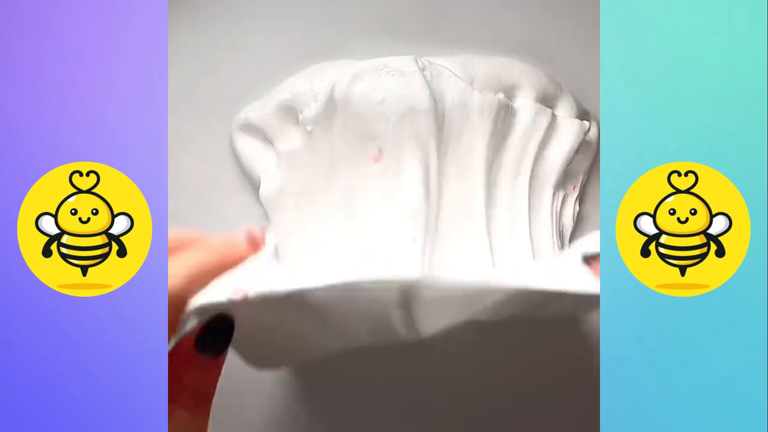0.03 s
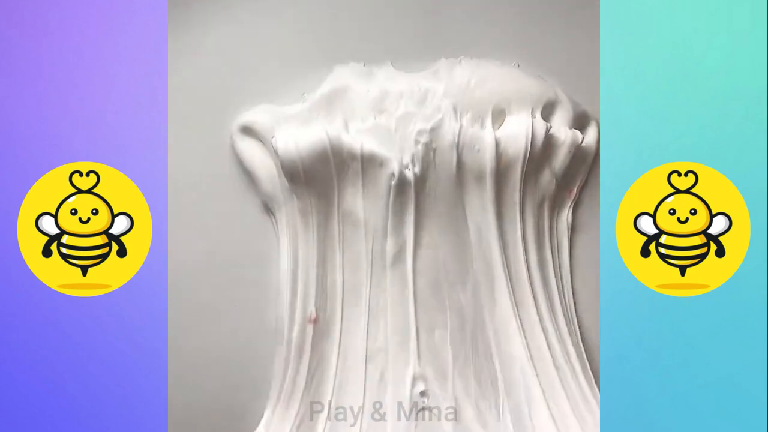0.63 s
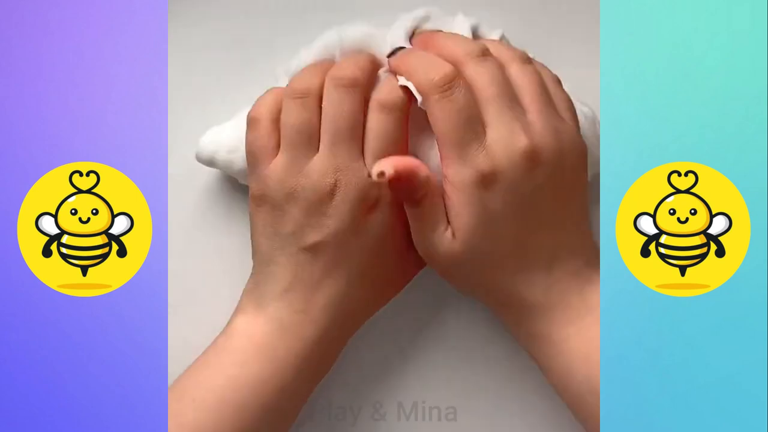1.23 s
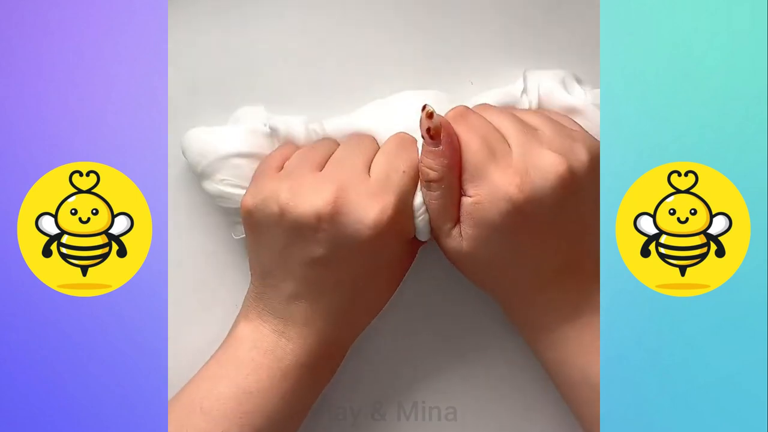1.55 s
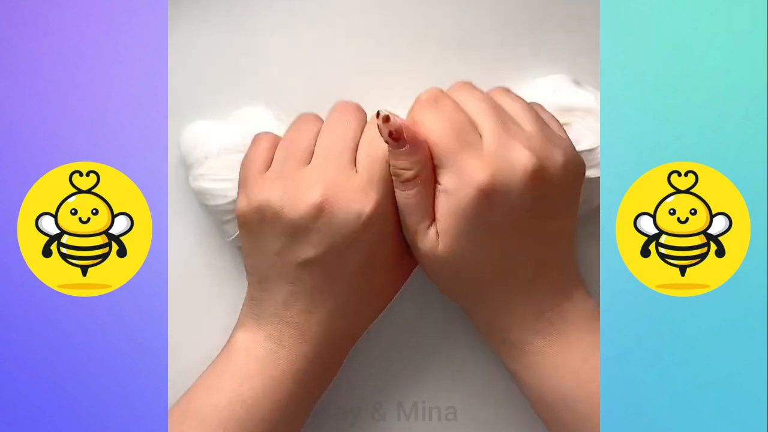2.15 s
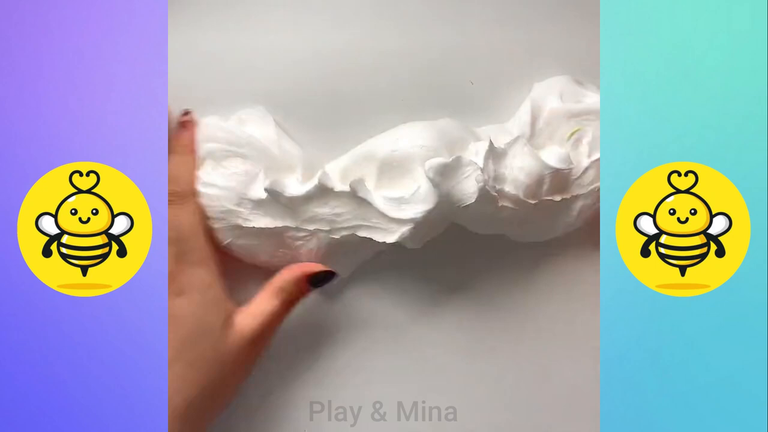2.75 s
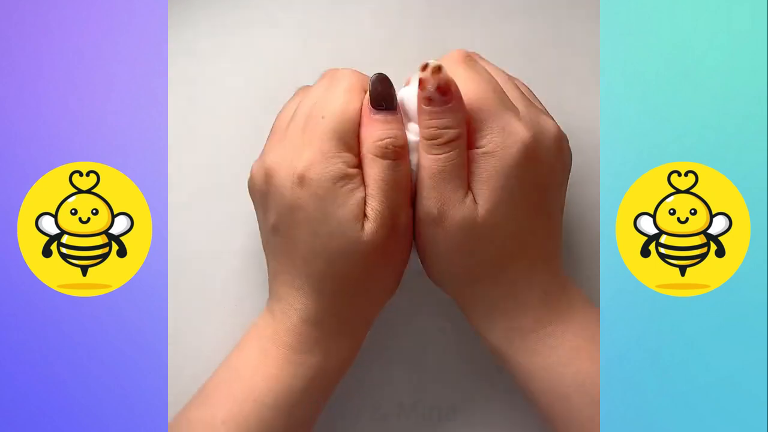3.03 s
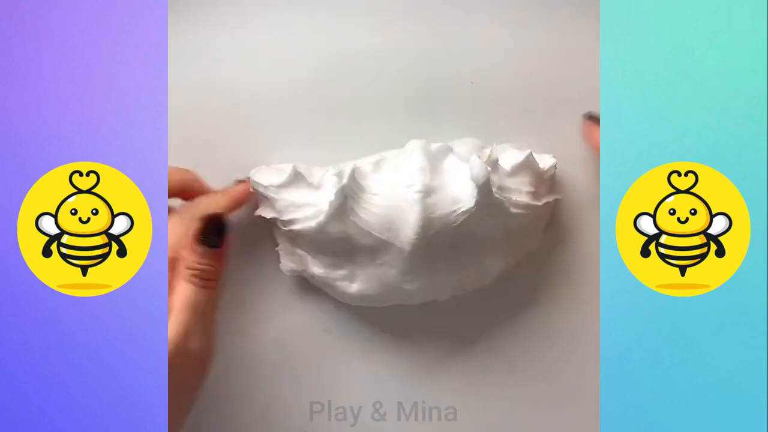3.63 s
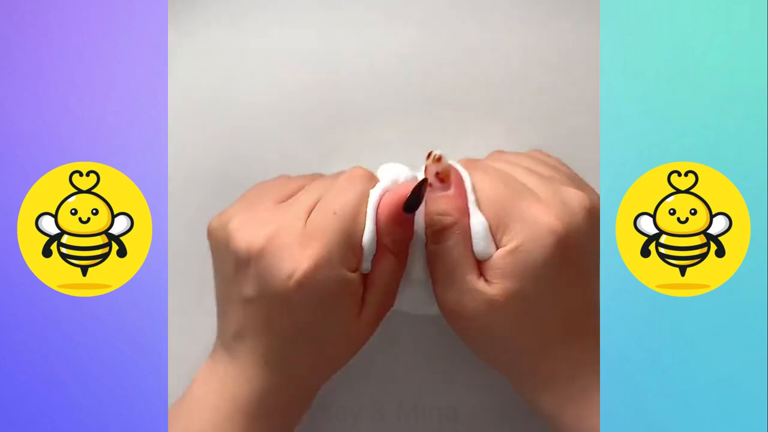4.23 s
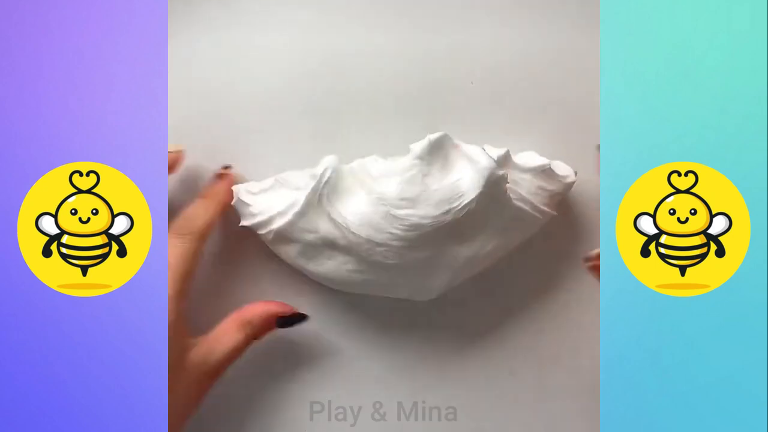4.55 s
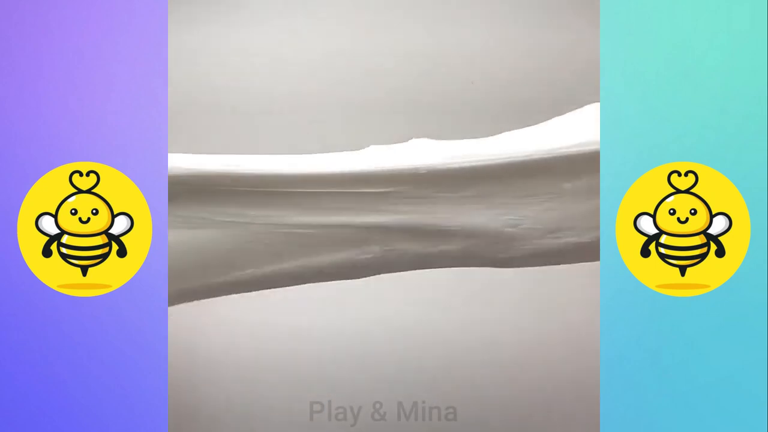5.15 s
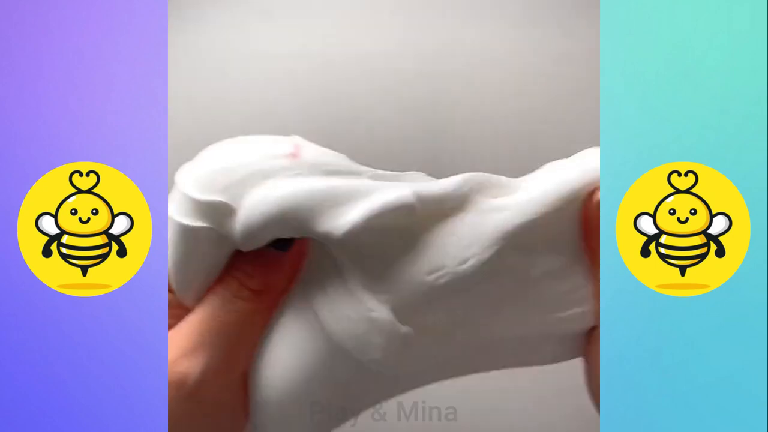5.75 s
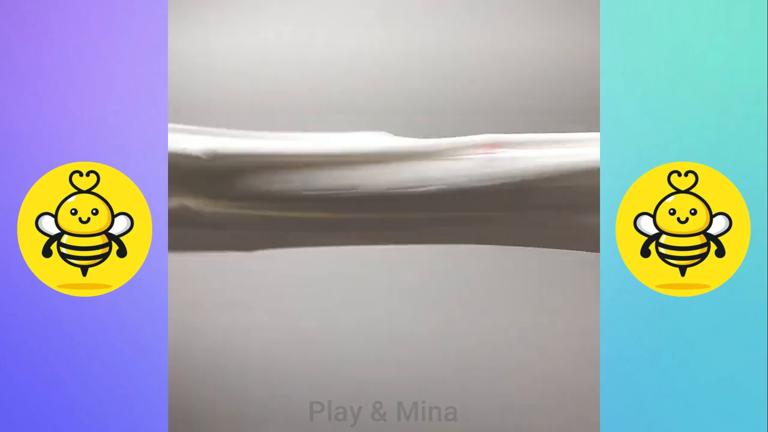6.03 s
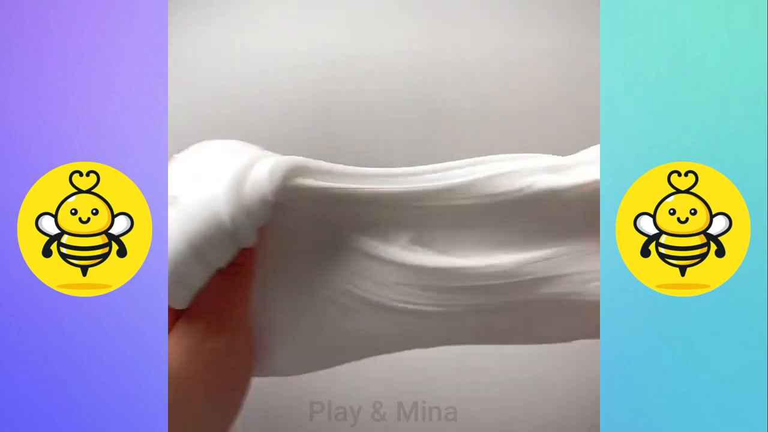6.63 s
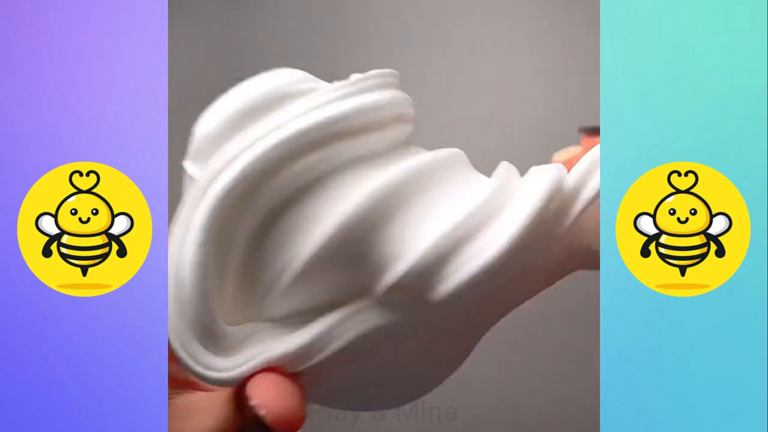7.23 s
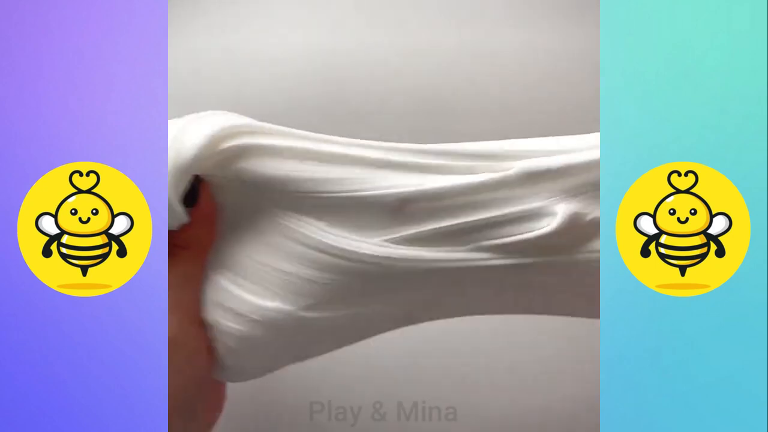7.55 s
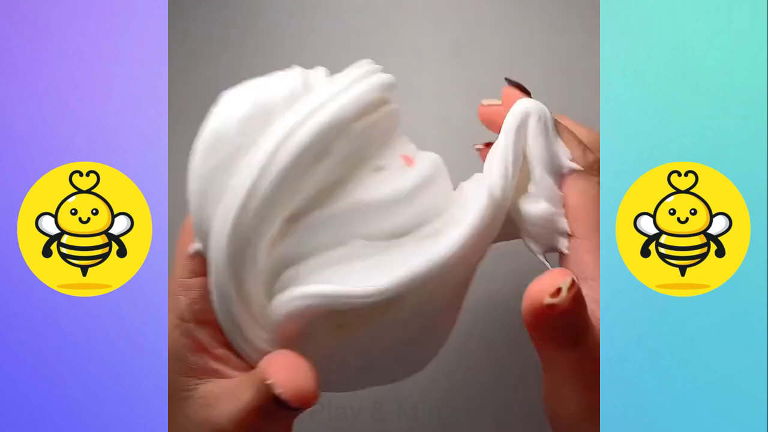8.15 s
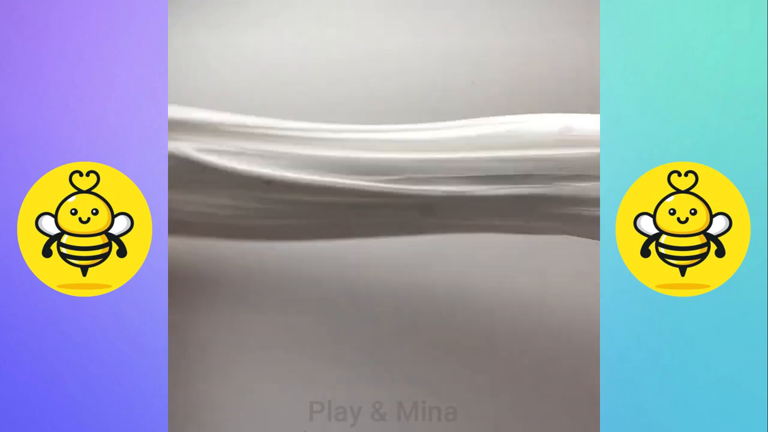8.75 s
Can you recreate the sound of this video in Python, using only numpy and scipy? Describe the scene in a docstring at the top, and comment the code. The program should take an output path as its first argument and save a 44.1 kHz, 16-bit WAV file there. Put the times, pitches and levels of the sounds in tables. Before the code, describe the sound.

Hands press and fold fluffy slime on a table, close to a stereo microphone in a small quiet room. Tiny bubbles fizz with each squeeze, air pockets burst in wet pops, and the tabletop thumps softly, with one loud squelching cluster early on. In the second half the slime is stretched about once a second with a soft crackle and rising squish, and claps shut four times with a hollow plop.

```python
"""At a table in a small quiet room, hands press and fold fluffy slime close to a stereo microphone.
Tiny bubbles fizz with every squeeze, trapped air pockets burst in wet, falling pops, and the hands
thump the table top. Later the slime is lifted and pulled into a sheet with a rising squish, about once
a second. Four times it claps shut on the air inside with a hollow plop."""
import sys
import numpy as np
from scipy import signal
from scipy.fft import rfft, irfft, next_fast_len
from scipy.io import wavfile

SR = 44100
rng = np.random.default_rng(int(sys.argv[2]) if len(sys.argv) > 2 else 0)


def put_to_file(sound):
    """Save the sound as 16-bit audio at rate SR, in the file named by the first command-line argument."""
    columns = np.atleast_2d(sound).T  # one column per channel
    safe = np.clip(columns, -1, 1)
    whole_steps = np.round(safe * 32767)
    wavfile.write(sys.argv[1], SR, whole_steps.astype(np.int16))


N = 396459
SHORT, LONG = 8192, 2 * next_fast_len(N // 2 + 1)  # samples for one short sound and for the whole scene
T = np.arange(SHORT) / SR
HZ, ALL_HZ = np.fft.rfftfreq(SHORT, 1 / SR) + 1, np.fft.rfftfreq(LONG, 1 / SR)
OVERTONE = 2.3  # an air pocket's second pitch is this many times its first

def amp(db):
    """Turns decibels into a number to multiply by."""
    return 10 ** (np.asarray(db) / 20)

def look_up(curve, hz):
    """Reads smoothly between the rows of a (frequency, value) table."""
    row_hz, value = np.transpose(curve)
    return np.interp(np.log(hz + 1), np.log(row_hz), value)

def unit(x):
    """Scales a sound to an energy of one per channel, on average."""
    return x / np.sqrt(np.mean(np.sum(x ** 2, -1)) + 1e-20)

def pan(left_db):
    """Gains that make the left side left_db louder than the right."""
    return amp([[left_db / 2], [-left_db / 2]])

def add(mix, start_s, sound):
    """Mixes a sound in at its start time."""
    part = mix[:, max(round(start_s * SR), 0):][:, :sound.shape[-1]]
    part += sound[..., :part.shape[1]]

def add_hit(mix, start_s, sound, lead_in=512):
    """Mixes in a short hit, first moving its soft lead-in from the end of the array to the front."""
    gain = np.sqrt(.005 * SR)  # an energy of one becomes a level of one over 5 ms
    fade = signal.windows.tukey(SHORT, lead_in / SHORT)
    add(mix, start_s - lead_in / SR, gain * np.roll(sound, lead_in, axis=-1) * fade)

def hump(centre_hz, octaves):
    """A bell-shaped filter curve around one pitch."""
    return np.exp(-.5 * (np.log2(HZ / centre_hz) / octaves) ** 2)

def filtered(x, curve):
    """A short sound passed through a filter curve, with an energy of one."""
    return unit(irfft(rfft(x) * curve))

def coloured(x, tone):
    """Shapes a scene-long sound with a (Hz, dB) table and sets its average level to one."""
    return np.sqrt(N) * unit(irfft(rfft(x, LONG) * amp(look_up(tone, ALL_HZ)), LONG)[..., :N])

def resonate(x, hz, width_hz):
    """Makes x ring at a moving pitch by passing it twice through the same resonance."""
    turn, feedback = np.exp(2j * np.pi * np.cumsum(hz) / SR), np.exp(-np.pi * width_hz / SR)
    for _ in range(2):
        x = 2 * (turn * signal.lfilter([1 - feedback], [1, -feedback], x / turn + 1e-18)).real
    return x

def gulp(pitch_hz, octaves, turns):
    """A ringing push whose treble arrives before its bass, so the pitch drops; more turns, slower drop."""
    phase = 2 * np.pi * (turns * np.log(HZ) + rng.random())
    tone = hump(.8 * pitch_hz, octaves) + .8 * hump(pitch_hz, .1)
    return unit(irfft(tone * np.exp(-1j * phase)))

def wet_gulp(pitch_hz):
    """Escaping air gulps and scatters off the hands and folds."""
    noise = rng.standard_normal((2, SHORT))
    splash = (noise[0] + .5 * noise) * T * np.exp(-T / .0048)
    scatter = filtered(splash, hump(pitch_hz, 1))
    air = np.roll(gulp(pitch_hz, octaves=.8, turns=1.4), round(.0007 * SR))
    return unit(air + .35 * scatter)

def crack(centre_hz, decay_s, octaves, ring, rise_s=.00019):
    """A skin of slime tears: a short burst of noise with a few narrow ringing pitches."""
    shared, apart = rng.standard_normal((2, 2, SHORT))
    snap = 4 * np.exp(-T / .00013)  # the first instant is the strongest
    envelope = (1 - np.exp(-T / rise_s)) ** 2 * (np.exp(-T / decay_s) + snap)
    side_rings = sum(hump(centre_hz * 2 ** k, .05) for k in rng.uniform(-1.4, 1, size=3))
    rings = hump(centre_hz, .14) + side_rings
    bass_cut = HZ ** 2 / (HZ ** 2 + 1100 ** 2)
    tone = hump(centre_hz, octaves) * (1 + ring * rings) * bass_cut
    return filtered((shared[0] + 1.3 * apart) * envelope, tone)

def air_ring(hz, decay_s, octaves_per_s):
    """The air in an open pocket rings for a few cycles; its pitch slides as the pocket changes size."""
    pitch = hz * 2 ** (octaves_per_s * (np.minimum(T, 6 * decay_s) - decay_s))
    return unit(T * np.exp(-T / decay_s) * np.sin(2 * np.pi * np.cumsum(pitch) / SR))

# The tone of the quiet room. Each row: frequency in Hz, relative level in dB.
HUSH_TONE = [(20, -13), (65, 14.5), (130, 4), (400, -8), (1500, -19.5), (6000, -18.5), (15000, -27.5)]
def room_hush():
    """A faint, steady, mostly low noise."""
    noise = rng.standard_normal(N) + .5 * rng.standard_normal((2, N))
    return amp(-58.5) * coloured(noise, HUSH_TONE)

# How long the room echoes. Each row: frequency in Hz, seconds to fade by 60 dB.
ECHO_TIMES = [(150, 0.19), (1000, 0.15), (5000, 0.19), (14000, 0.066)]
def room_echo(x):
    """Scattered reflections, each pitch fading at its own speed; the bass is alike on both sides."""
    reflections = rng.standard_normal((2, SR)) * (rng.random((2, SR)) < 3000 / SR)
    reflections *= np.arange(SR) > .003 * SR  # none in the first 3 ms
    hz, t, (left, right) = signal.stft(reflections, SR, nperseg=256)
    alike = np.exp(-(hz / 650) ** 2)[:, None]
    bands = np.array([left, alike * left + np.sqrt(1 - alike ** 2) * right])
    fade = amp(-60 * t / look_up(ECHO_TIMES, hz)[:, None])
    tail = signal.istft(bands * fade, SR, nperseg=256)[1]
    return signal.fftconvolve(x, unit(tail), axes=1)[:, :N]

# Slime dragging over the table. Each row: middle in seconds, swell time in seconds, level in dB,
# pitch in Hz.
TABLE_DRAGS = [(0.403, 0.079, -51.5, 185), (3.907, 0.055, -45.5, 181), (5.025, 0.095, -45, 182)]
def groans():
    """Dragged slime sticks and slips, giving a low, rough groan that rises slightly."""
    out, t = np.zeros((1, N)), np.arange(SR) / SR - .5
    for middle, swell_s, db, hz in TABLE_DRAGS:
        pitch = hz * 2 ** (.05 * np.tanh(t / swell_s))
        slip = resonate(rng.standard_normal(SR), pitch, width_hz=90)
        swell = np.exp(-(t / swell_s) ** 2)
        add(out, middle - .5, amp(db) * swell * np.sqrt(SR) * unit(slip))
    return out

# The table top's own notes. Each row: pitch in Hz, relative level in dB, seconds to fade by 60 dB.
TABLE_NOTES = [(68, -19, .3), (114, -3, .14), (130, 0, .25), (173, -6, .22)]
def table_ring():
    """The table top rings with a few low, fading notes after one knock."""
    return unit(sum(amp(db - 60 * T / fade_s) * np.sin(2 * np.pi * hz * T)
                    for hz, db, fade_s in TABLE_NOTES))

# Slime and hands landing on the table. Each row: start in seconds, level in dB, pitch in Hz,
# the table's ring in dB compared with the push.
LANDINGS = [(0.213, -24, 125.7, -0.5), (.232, -27, 41.97, -20), (.288, -31.5, 64.3, -10),
            (0.943, -33.5, 130, 7), (1.111, -46, 103.1, 10), (1.238, -15, 111.4, -4),
            (1.253, -18, 115.4, 8.5), (1.3, -26, 113.2, -6.5), (1.367, -6, 173.6, -25.5),
            (1.394, -5.5, 211.5, -27.5), (1.414, -24, 159.2, 2.5), (1.455, -24.5, 129.3, 15),
            (1.557, -17.5, 144.5, 3), (2.046, -21, 138.8, 7), (2.094, -22.5, 120.9, 12.5),
            (2.544, -32, 119.7, 4), (2.796, -24.5, 136.6, 6.5), (3.686, -40, 121.7, 15.5),
            (4.717, -33.5, 129.5, 4.5), (5.464, -31.5, 122.7, -13), (6.338, -21.5, 106.2, -19),
            (7.243, -18, 202.5, -14.5), (8.154, -26.5, 156.6, -14)]
def thumps():
    """Soft, heavy landings set the table ringing."""
    out, table = np.zeros((2, N)), rfft(table_ring())
    for start, db, pitch_hz, ring_db in LANDINGS:
        push = gulp(pitch_hz, octaves=1, turns=1.3)
        add_hit(out, start - .002, amp(db) * (push + amp(ring_db) * filtered(push, table)))
    return out

def stroke(rise_s, hold_s, sag_db_per_s, release_db_per_s):
    """One move of the hands: the grip builds, sags while it is held, and lets go."""
    t = np.arange(SR) / SR
    held = np.maximum(t - rise_s, 0)
    drop_db = sag_db_per_s * np.minimum(held, hold_s) + release_db_per_s * np.maximum(held - hold_s, 0)
    return np.minimum(t / rise_s, 1) ** 2 * amp(-drop_db)

# Squeezes and folds. Each row: start, rise and hold in seconds, release in dB per second, strain in dB,
# wetness in dB compared with the strain, push on the table in dB.
HAND_SQUEEZES = [(0.0, 0.039, 0.023, 158.5, -45, -14.5, -55.5),
                 (0.14, 0.06, 0.031, 259.5, -42.5, 7.5, -40.5),
                 (0.285, 0.037, 0.021, 240, -35.5, -6.5, -35.5), (0.452, .02, 0.063, 200, -57.5, -6, -55),
                 (0.639, 0.08, 0.099, 269, -47.5, -14, -67), (0.894, 0.044, 0.009, 270, -41.5, 6, -38),
                 (0.992, 0.031, 0.08, 246, -37, -11, -63), (1.208, 0.029, 0.075, 270, -37, 5.5, -41),
                 (1.342, 0.034, 0.095, 266, -16.5, 0.5, -26.5), (1.478, 0.034, 0.056, 146, -33, -2.5, -37),
                 (1.714, 0.026, 0.089, 290.5, -30.5, -1, -30.5),
                 (2.056, 0.03, 0.012, 273.5, -38.5, 16, -32), (2.138, 0.044, 0.055, 270, -25, -1.5, -34.5),
                 (2.279, 0.0077, 0.016, 215, -26, -9, -39.5), (2.453, 0.055, 0.01, 271, -30, 0, -43),
                 (2.534, 0.027, 0.028, 313.5, -38, -7, -39.5),
                 (2.787, 0.0053, 0.046, 269.5, -34.5, -7.5, -35),
                 (2.808, 0.058, 0.022, 214, -26.5, -8.5, -40), (2.953, 0.11, 0.19, 270, -41.5, -2.5, -49),
                 (3.343, 0.09, 0.074, 435.5, -31, -10, -38.5),
                 (3.673, 0.0062, 0.071, 271, -50.5, -0.5, -40),
                 (3.765, 0.033, 0.0096, 183, -41.5, -1.5, -45), (3.852, 0.13, 0.028, 274, -41, -10.5, -50),
                 (4.044, 0.096, 0.018, 267, -38.5, 2, -46), (4.217, 0.075, 0.14, 273.5, -44.5, -11, -45.5),
                 (4.309, 0.052, 0.036, 297.5, -35, -5, -44), (4.622, 0.12, 0.0072, 276, -34, -3.5, -48),
                 (4.772, 0.022, 0.019, 215, -49.5, 3, -38), (4.904, 0.016, 0.024, 153.5, -45.5, -2.5, -41),
                 (5.307, 0.044, 0.028, 270, -60.5, 11, -42.5), (5.441, 0.02, 0.084, 241.5, -49, 4.5, -45),
                 (5.601, 0.015, 0.024, 203, -52.5, -4, -71.5), (5.677, 0.058, .012, 172.5, -47, -2, -53.5),
                 (5.816, 0.028, 0.058, 202, -60.5, -3, -59), (6.194, 0.081, 0.11, 271, -46.5, -10.5, -56.5),
                 (6.405, 0.028, 0.28, 274, -52, 3, -62.5), (6.536, 0.023, 0.029, 270.5, -38, -23, -59),
                 (7.099, 0.074, 0.075, 275.5, -52, -9.5, -65.5), (7.205, 0.021, 0.07, 268, -45, 1, -47.5),
                 (7.324, 0.06, 0.16, 268, -52.5, -3.5, -66.5), (7.544, 0.032, 0.044, 122, -60, -0.5, -62),
                 (8.036, .04, 0.033, 267, -58.5, -3.5, -62.5),
                 (8.121, 0.021, 0.048, 270.5, -40.5, 0.5, -50.5), (8.235, 0.023, 0.04, 161, -52, 1, -70),
                 (8.343, 0.022, 0.024, 133.5, -50, -4.5, -70),
                 (8.498, 0.06, 0.074, 121.5, -60.5, -10, -77.5), (8.935, 0.052, 0.02, 273, -54.5, 0, -60)]
# Pulls into a sheet. Each row: start, rise and time until release in seconds, strain in dB,
# fade in dB per second as the sheet thins.
SHEET_PULLS = [(5.18, 0.056, 0.12, -39, 8.5), (5.989, 0.055, 0.13, -37.5, 34),
               (6.877, 0.055, 0.17, -39, 59.5), (7.805, 0.048, 0.16, -36, 65.5),
               (8.708, 0.057, 0.16, -38, 66.5)]
def hand_moves():
    """How strong the fizz, crackle, squelch and table rumble are over time, as the hands work."""
    fizz, crackle, squelch, rumble = np.zeros((4, 1, N))
    sag_db_per_s = 26.5  # bubbles run out while the grip holds
    for start, rise, hold, release, db, wet_db, push_db in HAND_SQUEEZES:
        strain = amp(db) * stroke(rise, hold, sag_db_per_s, release)
        add(fizz, start, strain)
        add(crackle, start, strain * amp(-3 + .62 * wet_db))
        add(squelch, start, strain * amp(wet_db))
        push = amp(push_db) * stroke(rise, hold, sag_db_per_s, release_db_per_s=135.5)
        add(rumble, start + .007, push)  # the weight of the hands comes a little later
    for start, rise, length, db, thinning in SHEET_PULLS:
        strain = amp(db) * stroke(rise, length - rise, thinning, release_db_per_s=249)
        add(fizz, start, strain)
        add(crackle, start, strain * amp(-8.5))
        add(squelch, start, strain * amp(-15))  # a pull is fairly dry
    return fizz, crackle, squelch, rumble

def bubbles(tone, pitches, count, spread_db, clump_db, sharpness):
    """A swarm of tiny ringing clicks, count of them at each pitch; like bubbles burst in clumps."""
    out, moments = np.zeros((2, N)), np.arange(0, N, SR // 55)
    together = rng.standard_normal(len(moments))
    for hz in np.geomspace(tone[0][0] * 1.187, tone[-1][0], pitches):
        at, clicks = rng.integers(0, N, count), np.full((2, N), 1e-20)
        clump = np.interp(at, moments, rng.standard_normal(len(moments)) + .5 * together)
        strength = amp(spread_db * np.minimum(rng.exponential(1, count), 4) + clump_db * clump)
        side = np.pi / 4 + rng.uniform(-.83, 1, count) * min(hz / 1300, 1)  # low notes stay central
        clicks[:, at] = strength * rng.choice([-1, 1], count) * np.array([np.cos(side), np.sin(side)])
        out += signal.lfilter(*signal.iirpeak(min(hz, .45 * SR), sharpness, fs=SR), clicks)
    return coloured(out, tone)

# The tones of four bubble sizes, smallest first. Each row: frequency in Hz, relative level in dB.
FIZZ_TONE = [(1300, 0), (2200, -2), (5000, 1), (8000, -3.5), (15000, -11)]
PRICKLE_TONE = [(1600, -4), (3000, 0), (5000, 0), (8000, -8)]
CRACKLE_TONE = [(450, -15.5), (750, -6.5), (1200, -2.5), (2000, -6), (3200, -19.5)]
SQUELCH_TONE = [(150, -27.5), (260, 2), (350, 5), (620, -5.5), (1000, -24.5)]
def kneading():
    """Bubbles of four sizes burst as the slime is strained, and the table rumbles under it."""
    fizz, crackle, squelch, rumble = hand_moves()
    fine = bubbles(FIZZ_TONE, pitches=24, count=4200, spread_db=3.5, clump_db=3, sharpness=24)
    sticky = bubbles(CRACKLE_TONE, pitches=14, count=520, spread_db=4, clump_db=3, sharpness=7)
    wet = bubbles(SQUELCH_TONE, pitches=9, count=600, spread_db=4, clump_db=4.5, sharpness=13)
    prickle = bubbles(PRICKLE_TONE, pitches=5, count=130, spread_db=4.5, clump_db=2, sharpness=5)
    drag = rng.standard_normal(N) + .29 * rng.standard_normal((2, N))
    table = unit(table_ring() + 1.3 * gulp(110, octaves=.89, turns=.756))
    boom = signal.fftconvolve(drag, table[None])[:, :N]
    return (amp(-1) * fizz * fine + crackle * (sticky + amp(-9.5) * prickle)
            + amp(-3) * squelch * wet + amp(-3.5) * rumble * boom)

# Small bubbles at the surface. Each row: start in seconds, level in dB, centre pitch in Hz.
SURFACE_TICKS = [(0.265, -32, 8400), (0.302, -29.5, 8540), (0.485, -50, 8200), (1.039, -32, 10900),
                 (1.578, -24, 8440), (1.621, -30.5, 8080), (2.192, -12.5, 8080), (2.317, -23.5, 8200),
                 (3.02, -44, 5500), (3.0595, -23.5, 8200), (3.082, -32, 11100), (3.162, -18, 10400),
                 (3.19, -36, 8200), (3.206, -27.5, 4530), (3.218, -37, 8200), (3.229, -34, 8200),
                 (3.334, -34, 11900), (3.355, -22.5, 14300), (3.727, -40.5, 8160), (3.996, -39, 5000),
                 (4.0877, -23, 5940), (4.137, -27.5, 12000), (4.2331, -29, 14130), (4.612, -57, 6020),
                 (4.741, -32.5, 8220), (4.925, -37, 8150), (5.508, -41, 3540), (5.623, -48, 3970),
                 (5.888, -35, 9050), (5.967, -42, 8150), (6.027, -33.5, 9000), (6.081, -24.5, 10300),
                 (6.403, -45, 5000), (6.686, -43.5, 8250), (6.921, -33.5, 5960), (6.942, -35, 4500),
                 (7.055, -42.5, 4980), (7.402, -52.5, 5960), (7.591, -50.5, 4430), (7.701, -56.5, 5920),
                 (7.7821, -35, 9870), (7.844, -38.5, 8150), (7.981, -41.5, 4000), (8.268, -41, 8240),
                 (8.373, -46, 4000), (8.401, -40, 3580), (8.571, -53.5, 5000)]
def ticks():
    """Small bubbles snap with a short, bright crack."""
    out = np.zeros((2, N))
    for start, db, hz in SURFACE_TICKS:
        add_hit(out, start, amp(db) * crack(hz, decay_s=.0016, octaves=1.5, ring=.8))
    return out

# Air squeezed through closing folds. Each row: middle in seconds, swell time in seconds, level in dB,
# pitch at the middle in Hz.
FOLD_SQUISHES = [(0.182, .008, -42, 750), (0.326, 0.014, -32, 1016), (0.341, 0.0087, -34, 1820),
                 (1.457, 0.049, -24.5, 2800), (1.517, 0.011, -28, 1100), (3.392, 0.052, -49.5, 600),
                 (4.142, 0.011, -34.5, 1076), (4.363, 0.053, -45, 610), (5.312, 0.054, -54, 877),
                 (6.091, 0.024, -42.5, 864), (7.003, 0.024, -42, 858), (7.187, 0.043, -51.5, 904),
                 (7.944, 0.038, -43.5, 886), (8.377, 0.0087, -48.5, 482), (8.851, 0.016, -38, 889)]
def squishes(bursts_per_s=2600, octaves_per_s=2.2):
    """Bursting bubbles ring the air in a fold; the fold shrinks, so its pitch rises."""
    out, t = np.zeros((2, N)), T - T.mean()
    for middle, swell_s, db, hz in FOLD_SQUISHES:
        bursts = rng.standard_normal((3, SHORT)) * (rng.random((3, SHORT)) < bursts_per_s / SR)
        pitch = hz * 2 ** (octaves_per_s * t)
        swell = np.exp(-(t / swell_s) ** 2)
        ring = resonate((bursts[2] + .35 * bursts[:2]) * swell, pitch, width_hz=210)
        add(out, middle + t[0], amp(db) * np.linalg.norm(swell) * unit(ring))
    return out

# Whistling jets of air. Each row: start and length in seconds, level in dB, first and last pitch in Hz.
AIR_JETS = [(1.408, .012, -12, 1000, 4600), (1.556, .008, -20, 1500, 3000)]
def squirts():
    """A pocket is pinched flat and its last air chirps upward."""
    out = np.zeros((2, N))
    for start, length, db, first_hz, last_hz in AIR_JETS:
        progress = np.linspace(0, 1, round(length * SR))
        pitch = first_hz + (last_hz - first_hz) * progress
        add(out, start, amp(db) * np.sin(np.pi * progress) * np.sin(2 * np.pi * np.cumsum(pitch) / SR))
    return out

# Soft bubbles opening. Each row: start in seconds, level in dB, pitch in Hz.
SOFT_BUBBLES = [(2.299, -16, 1630), (2.838, -38, 510), (2.877, -41, 805), (3.445, -44, 566),
                (4.136, -33, 1060), (4.797, -42, 403), (4.945, -48, 684), (5.4642, -28.5, 960),
                (5.886, -45.5, 1230), (6.264, -47, 970), (6.278, -36, 990), (6.288, -35.5, 930),
                (6.32, -26.5, 1060), (6.43, -45.5, 940), (8.142, -27, 1150)]
def plops(octaves_per_s=-28):
    """Soft bubbles open with a round, falling note, a weak overtone and a little splash."""
    out = np.zeros((2, N))
    for start, db, hz in SOFT_BUBBLES:
        decay_s = .87 / hz
        note = air_ring(hz, decay_s, octaves_per_s)
        overtone = amp(-11) * air_ring(OVERTONE * hz, decay_s, octaves_per_s)
        splash = amp(-8) * wet_gulp(hz)
        add_hit(out, start, amp(db) * (note + overtone + splash) * pan(left_db=4.5))
    return out

# The sheet clapping shut. Each row: start in seconds; clap level in dB and pitch in Hz; delay of the
# plop in seconds; cavity level in dB and pitch in Hz; crack level in dB, centre in Hz, width in
# octaves, rise and decay in seconds; tail level in dB; left over right in dB.
SHEET_CLAPS = [(6.3299, -22, 850, 0.0011, -21.5, 292, -24.5, 3720, 1, 0.00036, 0.0064, -41, 0),
               (6.5623, -14.5, 914, 0.00024, -14.5, 352, -7.5, 4450, 0.67, 0.000092, 0.0031, -38, -2),
               (7.2428, -7.5, 821, 0.00052, -12.5, 325, -12, 4260, .33, 0.00117, 0.0025, -25.5, 0),
               (8.1517, -14, 954, .0035, -23.5, 479, -15.5, 3530, 1, .0003, 0.0077, -32, 0.5)]
def claps(decay_s=.0013, octaves_per_s=-45, tail_fade_s=.39):
    """Two wet faces meet with a crack; air plops out, and the closing cavity leaves a hollow ring."""
    out = np.zeros((2, N))
    for (start, clap_db, clap_hz, delay_s, cavity_db, cavity_hz,
         crack_db, crack_hz, octaves, rise_s, tear_s, tail_db, left_db) in SHEET_CLAPS:
        note = air_ring(clap_hz, decay_s, octaves_per_s)
        overtone = amp(-17) * air_ring(OVERTONE * clap_hz, decay_s, octaves_per_s)
        cavity = air_ring(cavity_hz, .62 / cavity_hz, octaves_per_s)
        plop = np.roll(amp(clap_db) * (note + overtone) + amp(cavity_db) * cavity, round(delay_s * SR))
        smack = amp(crack_db) * crack(crack_hz, tear_s, octaves, ring=.41, rise_s=rise_s)
        splash = amp(clap_db - 8) * wet_gulp(clap_hz)
        air = rng.standard_normal(SHORT) + rng.standard_normal((2, SHORT))
        envelope = (1 - np.exp(-T / .0047)) * amp(-60 * T / tail_fade_s)
        hollow = (hump(1.3 * cavity_hz, .5) + .8 * hump(clap_hz, .22)
                  + .13 * hump(OVERTONE * clap_hz, .25) + .17 * hump(crack_hz, .15))
        tail = amp(tail_db) * filtered(air * envelope, hollow)
        add_hit(out, start, (smack + splash + plop + tail) * pan(left_db))
    return out

# Air pockets bursting. Each row: start in seconds, gulp level in dB, gulp pitch in Hz,
# crack level in dB, crack centre in Hz, left over right in dB.
AIR_POCKETS = [(0.1995, -23, 1470, -28, 3800, -1), (0.203, -30, 1170, -23.5, 2320, -4),
               (.213, -27.5, 720, -41, 2400, 7), (0.317, -31, 960, -39, 4430, 4),
               (0.932, -24.5, 1580, -19.5, 4370, -3), (0.942, -24.5, 1090, -32, 5270, 4),
               (0.956, -18.5, 1590, -26.5, 5700, -1), (1.236, -26, 570, -46, 3900, 4),
               (1.2496, -17, 745, -21.5, 3870, -1.5), (1.3, -20.5, 600, -27.5, 4250, 1),
               (1.364, -4.5, 428, -11, 4260, -4.5), (1.376, 1, 460, -19, 4860, 1),
               (1.391, -4.5, 417, -13, 5300, -2), (1.4066, -6, 626, -9, 4200, 3),
               (1.414, -6.5, 420, -6.5, 5100, -1), (1.4403, -6, 720, -4.5, 6030, 0),
               (1.4549, -7, 554, -13, 3800, -1), (1.458, -18, 910, -9, 2650, -1),
               (1.5545, -13.5, 1150, -18.5, 2660, 1), (1.737, -34, 1120, -27, 6260, -2),
               (1.766, -29, 646, -43.5, 4600, 13), (2.0816, -28.5, 550, -26, 5480, -3.5),
               (2.09, -14, 373, -31, 4600, -3.5), (2.156, -22.5, 1630, -25, 3000, 1),
               (2.176, -31, 1060, -16, 2860, -3), (2.181, -27, 1240, -29, 3740, 5),
               (2.211, -12, 480, -14.5, 5500, -2), (2.226, -13, 1170, -18.5, 4900, 4),
               (2.235, -22, 1010, -20.5, 4440, -3), (2.285, -23, 503, -20.5, 7050, -1),
               (2.2979, -21.5, 1160, -18.5, 4370, 1.5), (2.328, -26, 1020, -17, 7100, -0.5),
               (2.511, -31, 853, -31, 5320, -3), (2.791, -39.5, 489, -30.5, 4680, -0.5),
               (3.068, -43, 400, -27.5, 7740, 0), (3.095, -38, 367, -32, 6000, -3),
               (3.122, -35, 516, -26, 5950, -1), (3.162, -19, 990, -30, 3930, 2),
               (3.417, -28.5, 542, -28, 7980, -0.5), (3.682, -40.5, 550, -42.5, 4290, -4.5),
               (3.797, -43, 592, -33, 4440, -1), (4.087, -33.5, 970, -22, 5450, 3),
               (4.126, -36.5, 908, -30, 3030, -2), (4.135, -32, 1120, -24.5, 2920, 1),
               (4.151, -38, 1300, -24.5, 8700, -5), (4.347, -29, 433, -32.5, 6350, -0.5),
               (4.922, -37, 508, -40, 7300, 2.5), (5.4627, -31, 1153, -44.5, 3410, 8),
               (5.7604, -40.5, 1118, -43.5, 4630, -2), (6.285, -44.5, 915, -40.5, 2800, 2.5),
               (6.32, -39, 1050, -34, 4500, 7), (6.524, -26, 1040, -41.5, 3230, 1),
               (6.685, -49, 1008, -41, 5350, -2.5), (7.2299, -36.5, 950, -33.5, 3490, 3),
               (7.47, -34, 460, -33, 4400, -0.5), (8.135, -39, 1434, -31, 4500, -1.5)]
def pops():
    """The skin of a pocket tears with a crack, then the escaping air gulps."""
    out = np.zeros((2, N))
    for start, gulp_db, gulp_hz, crack_db, crack_hz, left_db in AIR_POCKETS:
        tear_s = .0057 * (1000 / gulp_hz) ** .45  # bigger, lower pockets tear for longer
        tear = amp(crack_db) * crack(crack_hz, tear_s, octaves=.96, ring=1.6)
        air = amp(gulp_db) * wet_gulp(gulp_hz)
        add_hit(out, start, (tear + air) * pan(left_db))
    return out

# How far the left side is ahead, for single sounds and for the kneading, which lies further left.
# Each row: frequency in Hz, head start in radians.
EVENT_LEAD = [(40, .1), (250, 0.5), (1000, 1.7), (2200, 0.56), (4000, 3.48), (9000, 4.04), (15000, 3.9)]
KNEADING_LEAD = [(40, 0.05), (300, 0.83), (1000, 1.4), (1500, 3.7), (2700, 6.3), (3800, 9.6), (5500, 16),
                 (15000, 33)]
def microphone(x, lead):
    """The left side of the microphone hears the table a little before the right."""
    shift = np.exp(.5j * look_up(lead, ALL_HZ) * np.array([[1], [-1]]))
    return irfft(rfft(x, LONG) * shift)[:, :N]

def scene():
    """The slime and table reach the microphone, together with the room's echo and hush."""
    bursts = pops() + plops() + ticks() + squirts() + squishes()
    sheet, dough = claps(), kneading()
    knocks = (thumps() + groans()) * pan(left_db=-1.4)
    hush = room_hush()
    echo = room_echo(amp(-11.5) * bursts + amp(-17) * sheet + amp(-10) * dough + amp(-16) * knocks)
    direct = microphone(bursts + sheet + knocks, EVENT_LEAD) + microphone(dough, KNEADING_LEAD)
    return direct + echo + hush

def record(dry):
    """The loudest pops are clipped, then the treble above 15600 Hz is cut."""
    treble_cut = signal.firwin(401, 15600, window=("kaiser", 8), fs=SR)
    return signal.oaconvolve(np.clip(dry, -1, 1), treble_cut[None], "same")

dry = scene()
out = record(dry)
put_to_file(out)
```